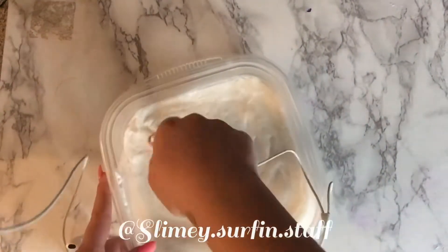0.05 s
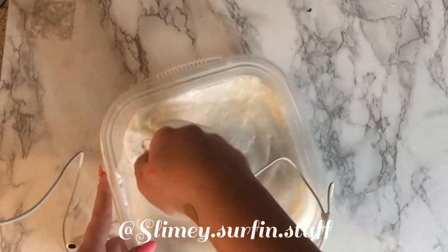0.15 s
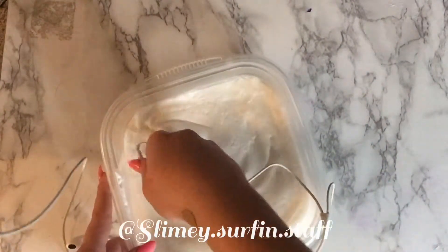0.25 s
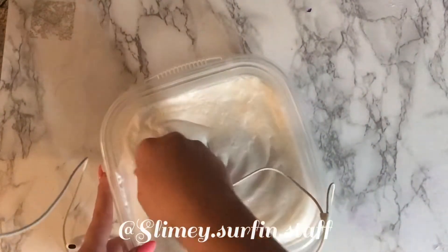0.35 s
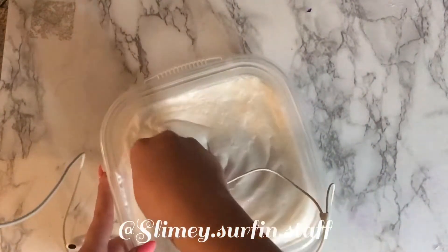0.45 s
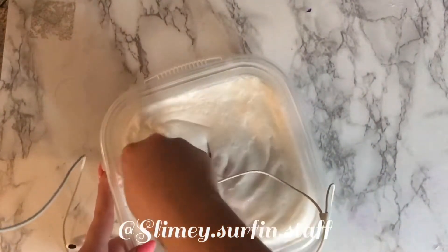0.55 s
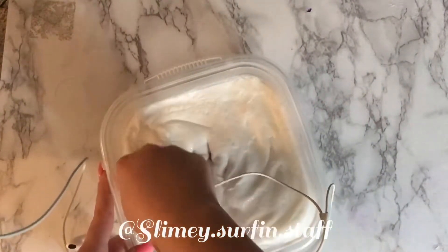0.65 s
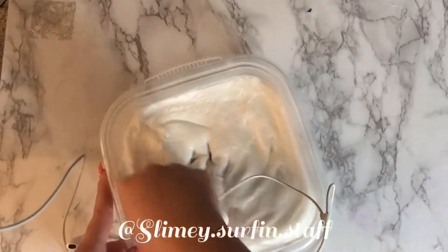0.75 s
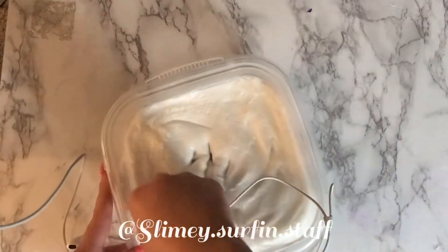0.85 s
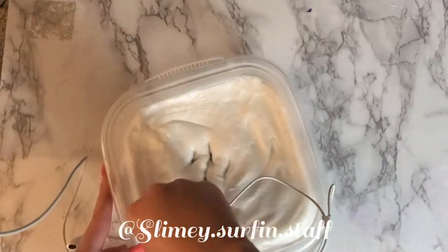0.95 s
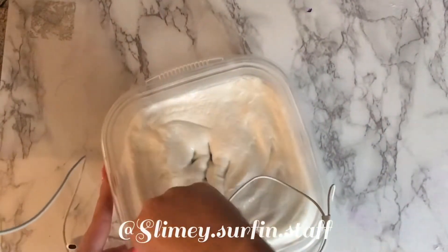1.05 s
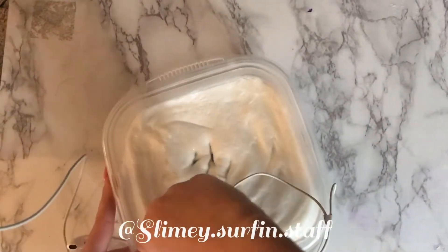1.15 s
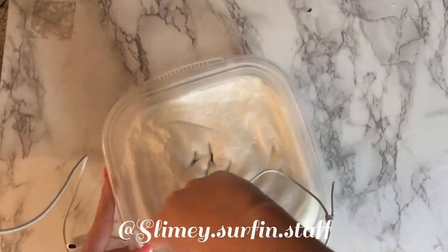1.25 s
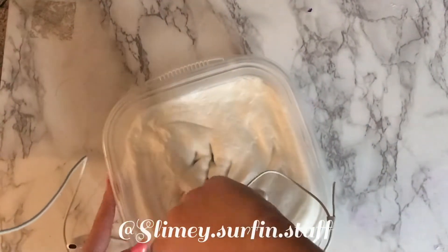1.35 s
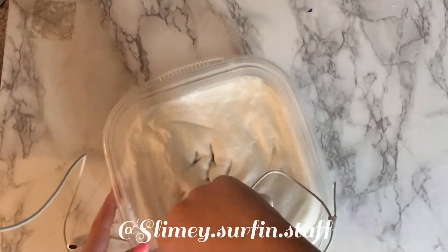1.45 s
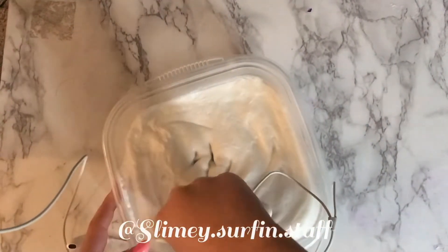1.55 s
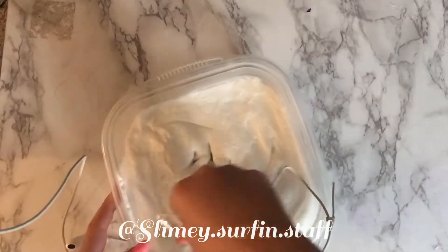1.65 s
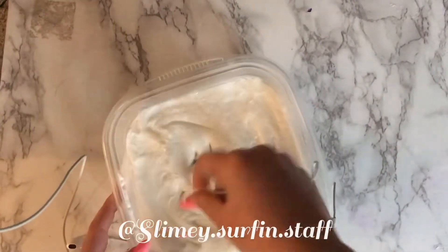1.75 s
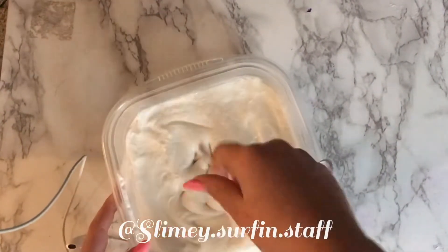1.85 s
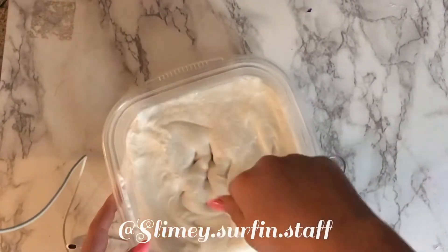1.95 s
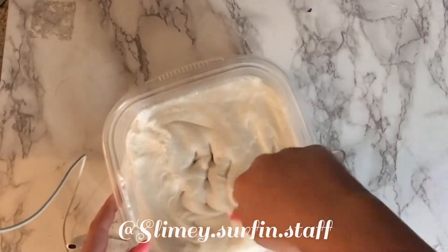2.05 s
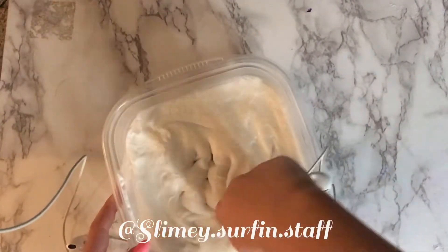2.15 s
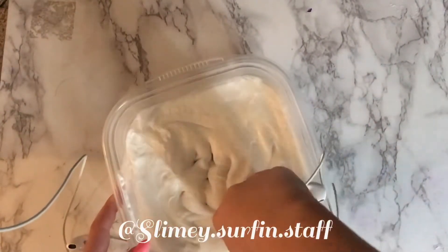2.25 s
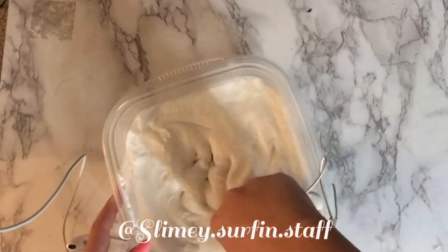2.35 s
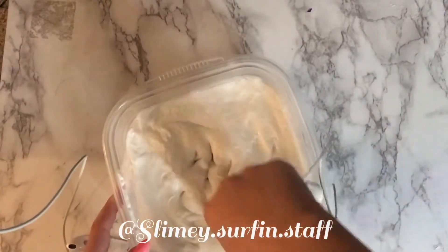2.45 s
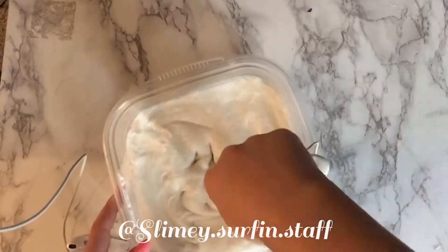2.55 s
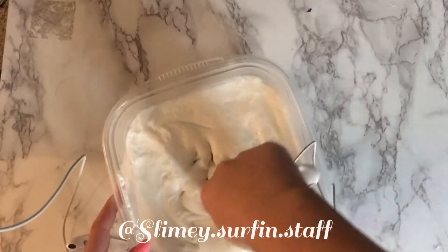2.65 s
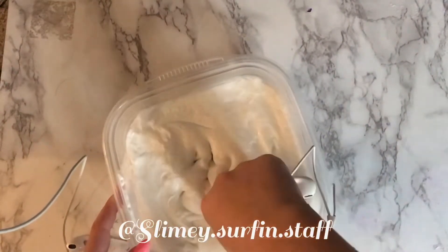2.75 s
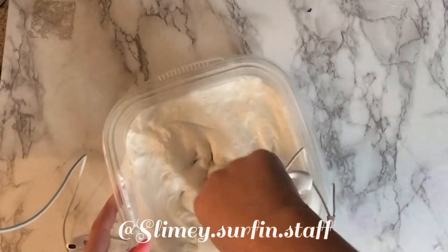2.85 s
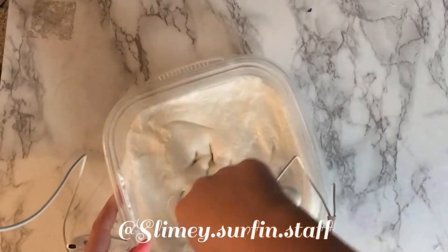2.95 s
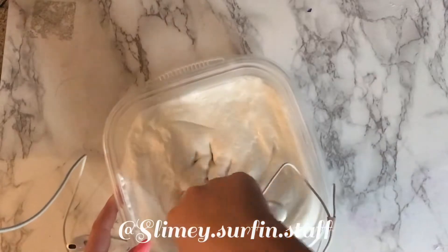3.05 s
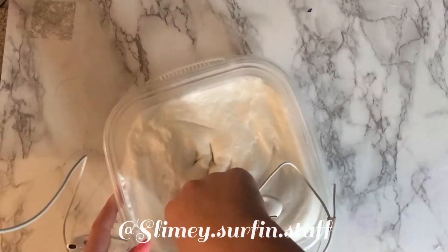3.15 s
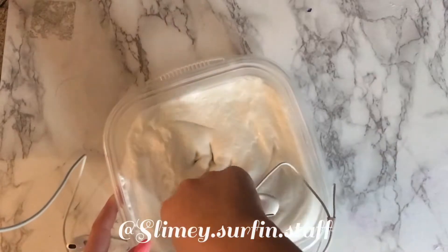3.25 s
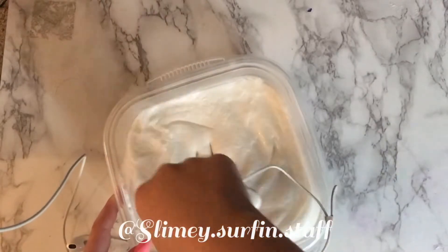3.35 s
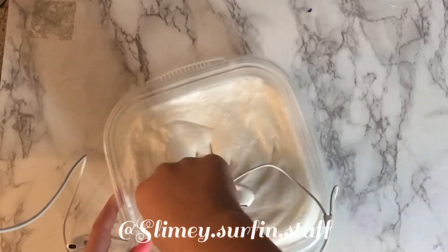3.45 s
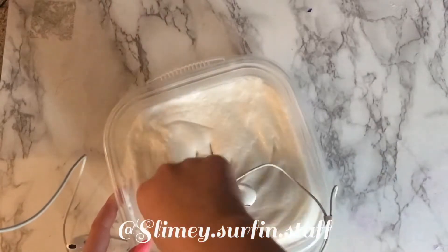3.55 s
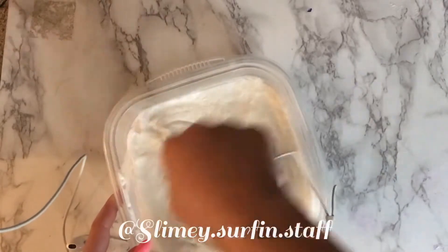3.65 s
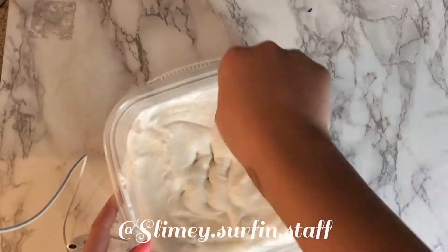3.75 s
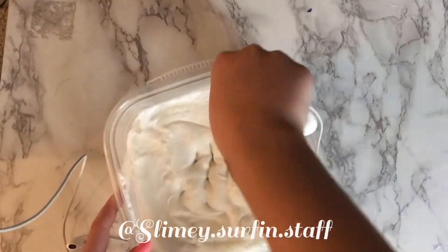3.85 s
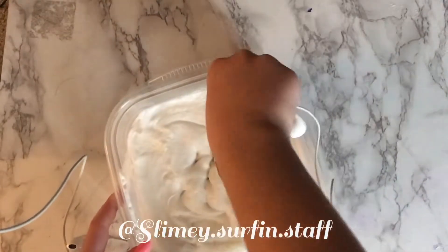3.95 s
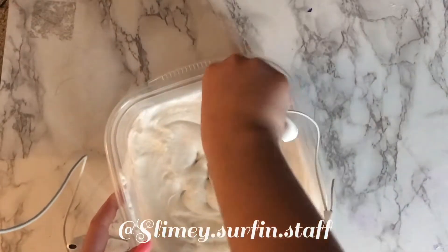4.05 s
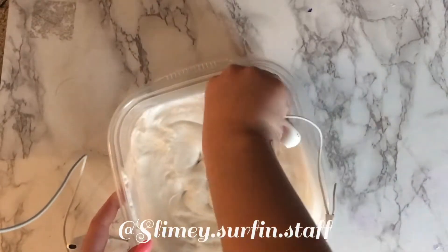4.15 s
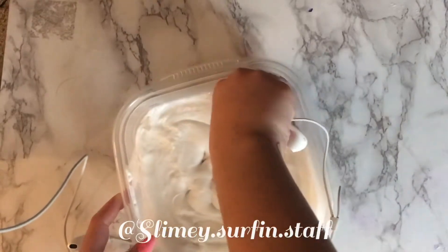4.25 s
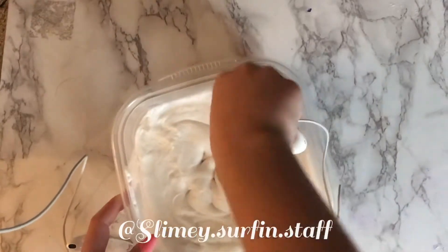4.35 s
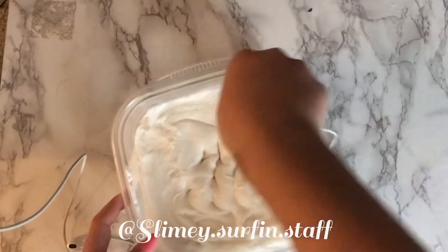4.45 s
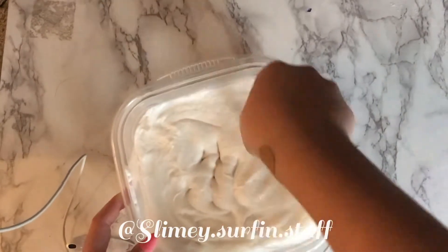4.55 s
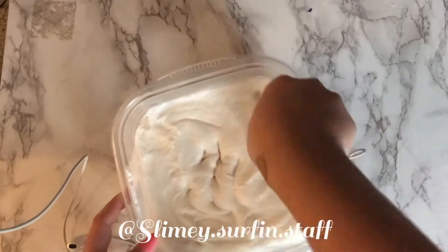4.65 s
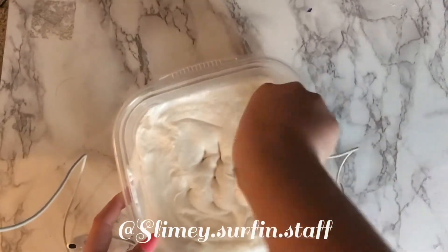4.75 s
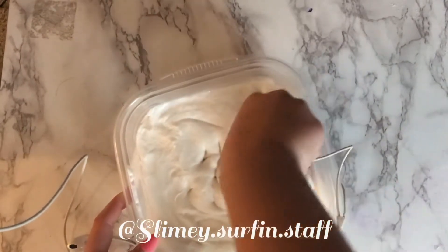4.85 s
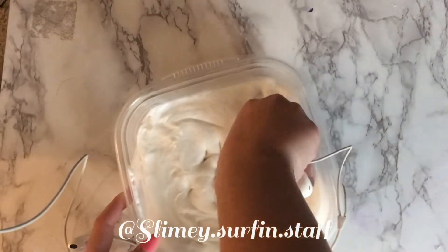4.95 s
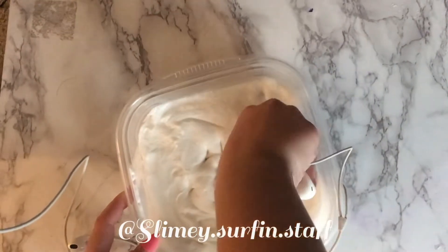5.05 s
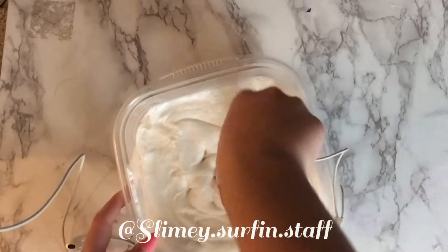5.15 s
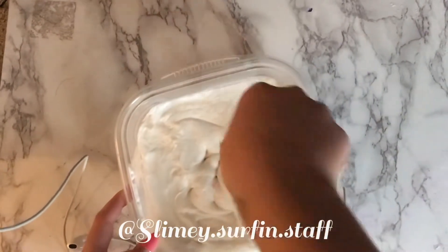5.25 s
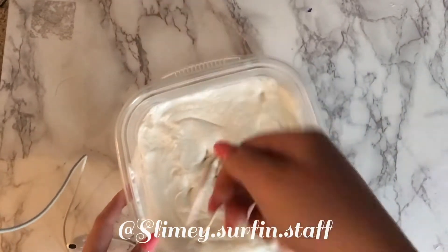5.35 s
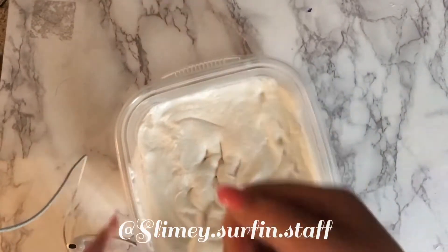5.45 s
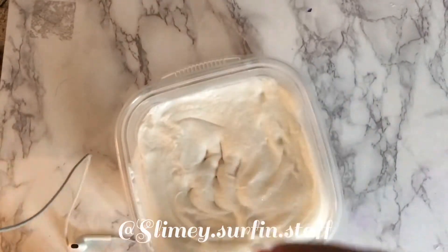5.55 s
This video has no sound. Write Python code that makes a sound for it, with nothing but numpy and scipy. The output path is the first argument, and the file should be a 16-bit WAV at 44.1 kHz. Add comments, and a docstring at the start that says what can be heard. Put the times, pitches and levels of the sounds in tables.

```python
"""Kneading airy slime

A hand presses slime in a plastic tub, with a small earphone microphone held right against it.
Rupturing films give short bright clicks, and trapped air pockets pop as damped oscillators.
Countless tiny bubbles fizz as the mass stretches, small pockets gurgle inside it, and the hand's push
thuds against the microphone and slowly heaves its membrane. A cavity in front of the capsule
resonates in the treble until the slime damps it. Faint rumble and hiss lie underneath."""
import sys
import numpy as np
from scipy import signal
from scipy.fft import rfft, irfft
from scipy.io import wavfile

SR = 44100
rng = np.random.default_rng(int(sys.argv[2]) if len(sys.argv) > 2 else 0)


def put_to_file(sound):
    """Save the sound as 16-bit audio at rate SR, in the file named by the first command-line argument."""
    columns = np.atleast_2d(sound).T  # one column per channel
    safe = np.clip(columns, -1, 1)
    whole_steps = np.round(safe * 32767)
    wavfile.write(sys.argv[1], SR, whole_steps.astype(np.int16))


N = 247120

# The mouth of the microphone's cavity. Each row: time in seconds, share free of slime from 0 to 1.
CAVITY_OPENING = [(0, 1), (.4, .87), (.6, .2), (1.5, .2), (1.7, .8), (2.1, .65), (2.3, .12), (5.6, .05)]


def film_snaps(times, levels_db, lengths_ms):
    """Sudden rupture radiates a broadband burst; levels_db sets its middle, cavity and top bands."""
    # The middle, cavity and top bands. Each row: lower edge in Hz, upper edge in Hz.
    bands = [(2000, 5460), (4700, 8050), (10000, 15500)]
    lead = SR // 500
    age = (np.arange(400) - lead) / SR * 1000 / lengths_ms[:, None]   # in snap lengths
    envelope = np.exp(-np.where(age < 0, 6.0, 2.2) * age ** 2)
    bursts = rng.standard_normal(age.shape) * envelope
    middle, broad, top = [band(bursts, low_hz, high_hz) for low_hz, high_hz in bands]
    ringing = cavity(broad, times[:, None])
    clicks = 0
    for part, level_db in zip((middle, ringing, top), levels_db):
        crest = np.sqrt(2 * np.mean(part[:, lead - 16:lead + 28] ** 2, axis=1))
        clicks = clicks + part * (from_db(level_db) / crest)[:, None]
    return place(times - lead / SR - .00015, clicks)


def clear_snaps():
    """Single films rupture as distinct clicks, whose spectral tilt makes them bright or dull."""
    # Each row: centre in seconds, cavity-band level in dB, tilt towards the treble in dB, length in ms.
    ruptures = [(0.0384, -36.5, 11, .5), (0.077, -20.5, 9.5, .4), (0.1282, -10, 4.5, .5),
                (.159, -31, 2, .5), (.167, -33, 11, .7), (.186, -29, 13, 1.2), (0.1906, -22, 8.5, .9),
                (.2865, -38.5, 11, .9), (0.3103, -36.5, 11, 1.5), (.371, -39, 3, 1.2),
                (0.422, -27.5, 0, .7), (0.424, -17, -2, 1.1), (.4277, -12, 8, .9), (0.43, -9, 5, .6),
                (0.4543, -9, 2, 1.4), (0.4571, -15, 9.5, .6), (.4796, -32.5, 3, .3),
                (.5006, -33.5, -11.5, .3), (.5867, -23.5, 11, .2), (0.5939, -26, 3, .5),
                (0.6253, -22.5, 4.5, .3), (.679, -29.5, -11, .7), (.693, -5.5, -9, .4),
                (0.7195, -30, 13, .3), (.7314, -11, 6.5, .2), (0.8298, -28.5, -6.5, .3),
                (0.8783, -27.5, 12.5, .3), (1.0194, -35.5, 2, .3), (1.1731, -54, 19, .3),
                (1.1863, -56, 22, .4), (1.3063, -39.5, 16.5, .7), (1.3467, -47, 14, 0.24),
                (1.3992, -34, 10, .3), (1.4334, -36.5, 6, 0.24), (1.642, -33, -1, .2),
                (1.645, -36, 13, 1.4), (1.6553, -25, 3, .5), (1.6724, -36, 1, .5), (1.713, -25.5, 8, .7),
                (1.735, -28.5, 7.5, .5), (1.704, -38, 9, .3), (1.744, -27.5, 8.5, 1.1),
                (1.964, -44.5, 7, .4), (2.221, -44.5, 11, .2), (2.2639, -37.5, 7, .3),
                (2.285, -33.5, -0.5, .7), (2.321, -50, 13, .2), (2.345, -37, 7, .4),
                (2.3747, -19.5, -13, .6), (2.3776, -37.5, -26, .7), (2.4544, -31, -8, .3),
                (2.4771, -27.5, 13, .2), (2.4875, -23, 14, .3), (2.49, -19, 4, .3), (2.507, -28.5, 8, 1.3),
                (2.637, -52.5, -15, 0.37), (2.7096, -48.5, 14, .3), (2.7606, -32.5, 7.5, .7),
                (2.7647, -45, 13, .2), (2.7698, -38, 4, .2), (2.809, -41, -7, .2), (2.8255, -40, 10, .2),
                (2.8727, -31.5, 10, .7), (2.914, -15.5, 7.5, .3), (2.9166, -32, 4, 0.24),
                (2.924, -26.5, 5, 2.9), (3.0679, -33, 6, .2), (3.0757, -14, 11.5, .2),
                (3.0906, -17.5, 16, .2), (3.1236, -37, 6, 1.5), (3.2095, -30.5, -14.5, .8),
                (3.2044, -42, -3, .7), (3.216, -1, -.5, .8), (3.2352, -34, -9.5, .5), (3.2961, -27, -1, .2),
                (3.3363, -32.5, 22, .3), (3.3378, -17.5, -13.5, .2), (3.3503, -34.5, 4, .6),
                (3.505, -27, 2, .2), (3.5088, -8, 3, .3), (3.5178, -0.5, 0, .9), (3.6193, -36, -11, 0.61),
                (3.6297, -19.5, 1, 1), (3.6358, -17, -2, 2.7), (3.636, -19.5, 5, 1), (3.6512, -36, 11, 1.8),
                (3.665, -19.5, 7, .9), (3.9153, -37, -0.5, 1.3), (3.9872, -40, 2.5, .3),
                (4.0337, -27, 0.5, .4), (4.0513, -31, -23, .3), (4.233, -42, -25, .3), (4.317, -28, -9, .6),
                (4.3223, -46, -15, .5), (4.4047, -36, 20, 0.68), (4.4224, -24, 3, 0.24),
                (4.4262, -27, 18.5, 0.58), (4.4305, -20.5, 10, .4), (4.4553, -20, 3, .5),
                (4.7311, -46, 8, 0.48), (4.736, -42, -21.5, 1), (4.798, -50, 11, 0.18),
                (4.8126, -31.5, 5.5, .2), (4.944, -43.5, -4, .3), (4.9744, -31, 8.5, .2),
                (4.9863, -33, 9, .3), (5.0097, -46, -3, .2), (5.017, -50, 7, .2), (5.0342, -2, -6.5, 0.33),
                (5.0491, -27, -13.5, .4), (5.1537, -35, -7, 1), (5.165, -41, -3, 1), (5.1764, -33, 14, .9),
                (5.1823, -31, 16, 0.28), (5.1965, -24.5, 2, .6), (5.1993, -25, 20, .3),
                (5.437, -40.5, 5, .8)]
    times, cavity_db, tilt_db, lengths_ms = np.transpose(ruptures)
    outer_db = cavity_db - 4 + 0.34 * np.minimum(tilt_db, 0)   # dull snaps lose more top than they gain
    return film_snaps(times, (outer_db - tilt_db, cavity_db, outer_db + tilt_db), lengths_ms)


def crackle(top_db, cavity_db, middle_db, count=1100):
    """Small films rupture as a random point process, coloured like the fizz and growing faster than it."""
    at = rng.integers(SR // 100, N, count)
    size, length, *colours = rng.standard_normal((count, 5)).T
    over_fizz_db = 1.5 + 0.65 * (top_db[at] + 37.5) + 5.5 * size
    levels_db = [fizz_db[at] + over_fizz_db + 3.0 * colour
                 for fizz_db, colour in zip((middle_db, cavity_db, top_db), colours)]
    lengths_ms = np.clip(.45 * np.exp(.7 * length), .2, 2.2)
    return film_snaps(at / SR, levels_db, lengths_ms)


def pocket_pops():
    """Trapped air is a spring, damped by its soft wall; a hollow knock sounds as the wall parts."""
    # Each row: crest time in seconds, swing peak in dB, pitch in Hz, ring length in cycles,
    # knock peak in dB, knock pitch in Hz.
    pockets = [(0.1286, -30, 387, 0.37, -52, 1740), (0.1907, -33.5, 600, 0.37, -29, 1230),
               (0.3713, -29, 440, .55, -52, 900), (.3995, -29, 378, .5, -45, 880),
               (0.421, -25, 670, 5.1, -25, 920), (0.427, -17.5, 287, 1.5, -21.5, 1100),
               (0.4303, -11, 517, 0.43, -18.5, 1020), (0.454, -21.5, 322, 1.2, -12.5, 1780),
               (0.4579, -22.5, 356, 0.45, -25.5, 1190), (.5007, -30.5, 490, 0.46, -29.5, 1350),
               (.587, -39, 540, 0.76, -27.5, 1520), (.5938, -24.5, 466, 0.43, -33, 1110),
               (0.6787, -38, 210, 3.3, -31, 1700), (.6935, -3.5, 343, 1.8, -13.5, 1630),
               (0.7137, -26, 380, 0.9, -37, 1320), (.724, -27, 320, 0.71, -53.5, 1010),
               (.8012, -41, 530, 1.8, -40, 960), (0.8334, -31.5, 520, 2.3, -36, 1600),
               (0.8406, -31.5, 375, 4, -38, 1130), (0.8896, -27.5, 333, 1.6, -32.5, 1460),
               (0.9138, -23.5, 547, 1.7, -45, 825), (0.9496, -32, 280, 5, -46, 920),
               (1.004, -32.5, 370, 2.3, -54, 870), (1.0065, -26, 327, 4.8, -32, 830),
               (1.0172, -25.5, 415, 0.57, -47, 830), (1.0914, -39, 420, 3.6, -40.5, 835),
               (1.2049, -35, 516, 7.1, -64, 820), (1.348, -30.5, 466, 1.5, -63, 850),
               (1.393, -31, 290, 2, -62, 870), (1.456, -29.5, 240, 2.2, -35.5, 1390),
               (1.6452, -28.5, 307, 3.5, -28.5, 1680), (1.6733, -26, 390, 0.73, -61, 820),
               (2.2032, -48, 240, 2, -40.5, 1100), (2.3748, -14.5, 494, 0.79, -19, 1200),
               (2.4501, -28.5, 420, 1.3, -32.5, 930), (2.479, -25, 300, 0.98, -37, 1556),
               (2.5065, -21, 390, 2.3, -60, 1190), (2.762, -34, 288, 3, -70, 930),
               (2.8054, -53, 247, 5.2, -30, 1330), (2.81, -49, 283, 3.1, -36, 1360),
               (2.8744, -28, 290, 0.89, -52, 1060), (2.9252, -32.5, 231, 2.1, -34, 1070),
               (3.0768, -27, 287, 4.4, -33, 1100), (3.091, -31, 316, 2.5, -31, 1020),
               (3.128, -11.5, 352, 1.45, -16.5, 860), (3.1405, -27, 298, 2, -56, 800),
               (3.2056, -20, 320, 4.9, -18.5, 970), (3.2125, -20, 322, 2.3, -20, 1040),
               (3.2166, -17, 377, 1.4, -20.5, 1600), (3.3371, -4, 306, 0.86, -9.5, 1230),
               (3.3404, -22, 190, 1.4, -27, 1080), (3.3489, -43, 362, 0.99, -21.5, 1125),
               (3.504, -34, 295, 1.7, -32.5, 1120), (3.5174, -21.5, 434, 0.58, -11.5, 1670),
               (3.6304, -25, 400, 1.7, -45, 1250), (3.6349, -31, 410, 1.3, -21, 1325),
               (3.6492, -34, 490, 3.6, -30, 1330), (3.665, -26, 380, 0.6, -41, 1070),
               (3.9135, -31.5, 343, 2.3, -35.5, 1340), (4.0337, -42.5, 283, 2.2, -30, 1710),
               (4.0516, -23, 422, 0.45, -27, 1280), (4.2318, -45, 450, 1.6, -34.5, 1680),
               (4.3223, -29.5, 302, 0.84, -33.5, 1420), (4.4209, -23, 283, 1.8, -25, 1080),
               (4.4515, -27, 320, .93, -29.5, 1230), (4.4563, -15.5, 376, 0.45, -30, 936),
               (4.7374, -14.5, 365, 1.6, -17, 1285), (4.8557, -32, 342, 4.5, -48, 1140),
               (5.0354, -11.5, 477, 1.35, -5.5, 1470), (5.049, -26.5, 576, 1.9, -21.5, 1320),
               (5.0889, -22, 370, 2, -59, 805), (5.152, -37, 653, 3, -30, 1080),
               (5.1653, -15.5, 314, 1.2, -17, 1340), (5.1968, -11, 510, 0.56, -12.5, 1150),
               (5.2015, -24, 473, 0.44, -26, 810), (5.2146, -27.5, 402, 1.9, -24.5, 1390),
               (5.2385, -41, 400, 0.96, -40, 1210)]
    times, swing_db, hz, cycles, knock_db, knock_hz = np.transpose(pockets)[:, :, None]
    cycles = np.clip(cycles, .5, 4)
    sign = rng.choice([-1, 1], times.shape)   # air bursts out or is sucked in
    swing = from_db(swing_db) * damped_swing(hz, 24.0 / cycles, 83, 1400, samples=1500)
    knock = from_db(knock_db) * damped_swing(knock_hz, 10.0 / cycles ** .3, 380, 2800, samples=400)
    return place((times - 0.28 / hz)[:, 0], sign * swing) + place(times[:, 0] - .0004, sign * knock)


def thuds():
    """The mass pushes on the microphone: a heavily damped oscillation of about one slow cycle."""
    # Each row: crest time in seconds, peak level in dB.
    pushes = [(0.426, -27.5), (.456, -35), (0.695, -34), (0.85, -39), (0.951, -39), (1.457, -33),
              (1.674, -40), (1.771, -36.5), (2.211, -39.5), (2.343, -35), (2.374, -33), (2.447, -39),
              (2.509, -37), (2.688, -38.5), (2.764, -37), (2.891, -30.5), (2.931, -33.5), (3.076, -41),
              (3.139, -31), (3.219, -26.5), (3.34, -20), (3.359, -31.5), (3.466, -36), (3.518, -25.5),
              (3.625, -27.5), (3.654, -32.5), (3.929, -40), (3.995, -40), (4.055, -37), (4.173, -36.5),
              (4.4, -34), (4.426, -22), (4.461, -30), (4.741, -22), (4.783, -36.5), (4.858, -37),
              (5.111, -40), (5.14, -43), (5.203, -24)]
    times, peak_db = np.transpose(pushes)[:, :, None]
    direction, detune = rng.standard_normal((len(times), 2)).T[:, :, None]
    hz = 93 * np.exp(.08 * detune)
    swing = from_db(peak_db) * damped_swing(hz, 22.0, 40, 250, samples=4000)
    return place((times - .55 / hz)[:, 0], np.sign(direction) * swing)


def tearing_levels():
    """Incoherent sources add in power: tears over the settling mass set fizz and squelch levels in dB."""
    # Each row: crest time in seconds, top fizz in dB, 20 dB rise time in ms, 20 dB fall time in ms,
    # middle fizz relative to top in dB, squelch in dB.
    tears = [(0.083, -36.5, 18, 31, -24, -47.5), (0.178, -39.5, 53, 38, -17.5, -49),
             (.309, -49.5, 22, 95, -10, -60), (0.431, -30.5, 12.5, 2, -9, -29.5),
             (0.6, -50.5, 63, 127, -3.5, -48), (0.701, -45, 76, 82, -4, -47.5),
             (0.801, -41, 112.5, 100, -15, -48), (0.883, -45, 63, 77, -3.5, -42),
             (1.041, -50, 82, 81, -7.5, -42.5), (1.307, -43, 23, 27, -11.5, -45.5),
             (1.39, -62.5, 78, 64, 6, -47.5), (1.456, -50.5, 27, 55, -8, -62),
             (1.555, -52.5, 27, 35, -8, -52), (1.655, -48.5, 20, 76, -9, -52),
             (1.73, -52, 87, 60, -12, -45.5), (1.841, -60, 82, 48, -17, -51),
             (2.26, -63, 84, 60, -0.5, -64), (2.335, -50.5, 47, 61, -7, -49),
             (2.494, -39.5, 58, 20.5, -4, -37.5), (2.79, -56.5, 102, 63, -8, -60),
             (2.875, -45, 22, 34, -3.5, -42.5), (2.92, -35.5, 18.5, 13, -16, -39),
             (3.083, -49, 25, 34, -7, -52), (3.131, -51, 39, 15, 0, -39), (3.211, -44, 27.5, 22, 6, -31),
             (3.344, -35, 23, 22.5, -4.5, -31.5), (3.512, -48, 42.5, 60, -4.5, -48.5),
             (3.637, -39.5, 44.5, 25, 2, -33), (3.92, -58, 14, 35, -9, -57), (4.14, -47, 87, 108, -14, -61),
             (4.26, -56.5, 157, 173, 7.5, -46), (4.421, -37, 44, 34, -6.5, -40.5),
             (4.455, -37, 26, 20, -11, -39), (4.739, -65.5, 24, 57, 0.5, -46),
             (4.871, -58, 67, 130, 1, -55), (4.981, -54, 18, 27, 5, -56.5), (5.039, -51, 12, 105, -2, -52),
             (5.16, -40, 22.5, 42, -0.5, -34), (5.196, -36.5, 35, 13, -17, -34.5),
             (5.43, -70, 150, 51, 5, -60)]
    # The mass between tears. Each row: time in seconds, top fizz in dB, squelch in dB.
    settling = [(0, -63, -58.5), (.2, -61.5, -51), (.25, -80, -57.5), (.44, -62, -62.5), (.55, -68, -63),
                (.97, -60, -52), (1.13, -64, -58.5), (1.27, -60, -58.5), (1.52, -64.5, -56.5),
                (1.85, -64.5, -62), (1.92, -75.5, -59), (2.14, -72, -61.5), (2.55, -85.5, -62),
                (2.7, -70, -62), (3.05, -87, -64), (3.3, -53.5, -61), (3.391, -80, -66), (3.9, -83.5, -62),
                (4.051, -59, -55.5), (4.4, -56.5, -77), (4.501, -96, -77), (4.699, -87, -61.5),
                (5.0, -71.5, -54), (5.25, -79.5, -60.5), (5.6, -73.5, -72.5)]
    t = np.arange(0, N, 32) / SR
    times, calm_top_db, calm_squelch_db = np.transpose(settling)
    calm_db = np.interp(t, times, calm_top_db)
    power = from_db(2 * np.array([calm_db, calm_db - 6.5, np.interp(t, times, calm_squelch_db)]))
    for crest_s, top_db, rise_ms, fall_ms, relative_db, squelch_db in tears:
        distance = 1000 * np.where(t < crest_s, (crest_s - t) / rise_ms, (t - crest_s) / fall_ms)
        loss_db = 20 * np.minimum(distance, 4) ** 1.53   # an exponent above 1 rounds the crest
        crest_db = np.array([[top_db], [top_db + relative_db], [squelch_db]])
        power = power + from_db(2 * (crest_db - loss_db))
    top_db, middle_db, squelch_db = 10 * np.log10(power)
    cavity_db = top_db - 0.5 + 0.45 * (middle_db - top_db) + 3 * free_share(t)
    return [np.interp(np.arange(N) / SR, t, db) for db in (top_db, cavity_db, middle_db, squelch_db)]


def fizz(top_db, cavity_db, middle_db):
    """Tiny bubbles burst in clumps as shot noise: separate clicks over a bed too dense to count."""
    clumps = from_db(3.4 * drift(78) + 1.6 * drift(250))
    clicks = unit_rms(impulses(per_s=1800, spread_db=5.5))
    coloured = unit_rms(clicks * from_db(rng.normal(0, 6, (3, N))))   # one row a band
    bursts = clumps * (.9 * coloured + rng.standard_normal(N))
    top = band(bursts[0], 10500, 15000)
    ringing = cavity(band(bursts[1], 4100, 9600), np.arange(N) / SR)
    middle = band(bursts[2], 1000, 5600)
    return (from_db(top_db) * median_scaled(top) + from_db(cavity_db) * median_scaled(ringing)
            + from_db(middle_db) * median_scaled(middle))


def squelch(level_db):
    """Small pockets gurgle inside the mass: random impulses excite broad, low resonances."""
    gurgle = sum(resonance(impulses(per_s=120, spread_db=2.5), hz, 0.54 * hz) / hz ** 1.3
                 for hz in (162, 240, 380, 630, 953))
    return from_db(level_db + 0.87 * drift(25)) * unit_rms(band(gurgle, 80, 990))


def heave():
    """The hand compresses trapped air, whose leak acts as a high-pass filter; a faint sway lies below."""
    # Each row: centre in seconds, peak before leakage in dB, width in ms, 1 to press or -1 to pull away.
    squeezes = [(0.324, -32, 35, -1), (0.348, -34, 12, 1), (0.428, -35, 15, 1), (0.708, -29, 40, 1),
                (0.775, -37, 50, -1), (0.855, -36, 94, 1), (2.771, -36.5, 22, 1), (2.925, -34, 15, -1),
                (3.224, -33, 16, 1), (3.286, -39, 32, -1), (3.341, -34.5, 12.2, 1), (3.524, -21.5, 19, 1),
                (3.597, -26, 25, -1), (4.28, -28, 44, 1), (4.389, -23, 34, -1), (4.425, -41, 17, 1),
                (4.953, -35, 24, 1), (5.172, -33, 18, 1), (5.195, -46, 21, -1)]
    t = np.arange(N) / SR
    pressure = sum(np.sign(direction) * from_db(peak_db) * np.exp(-2.8 * ((t - centre) * 1000 / ms) ** 2)
                   for centre, peak_db, ms, direction in squeezes)
    leaked = signal.sosfilt(signal.butter(1, 2.5, "high", fs=SR, output="sos"), pressure)
    sway_db = -55 + 3.3 * drift(4.8)
    sway = unit_rms(band(rng.standard_normal(N + SR), 3.0, 27)[SR:])
    return leaked + from_db(sway_db) * sway


def room_noise():
    """Room rumble and microphone hiss are stationary noise, strongest at low frequencies."""
    # Each row: frequency in Hz, relative spectral density in dB.
    spectrum = [(20, -14.5), (35, -20.5), (70, -15.5), (125, -16.5), (300, -27.5), (450, -25), (750, -40),
                (1100, -39), (3000, -44.5), (16000, -52)]
    corner_hz, density_db = np.transpose(spectrum)
    hz = np.maximum(np.arange(N // 2 + 1) * SR / N, 1)
    gain = from_db(np.interp(np.log(hz), np.log(corner_hz), density_db)) * (hz > 15)
    return from_db(-57) * unit_rms(irfft(rfft(rng.standard_normal(N)) * gain, N))


def cavity(x, times, hz=7200, width_hz=1540):
    """The cavity before the capsule resonates while its mouth is free and is damped by the slime."""
    free = free_share(times)
    ringing = resonance(resonance(x, hz, width_hz), hz, 2 * width_hz)
    return 3.2 * free * ringing + (1 - free) * x   # the gain makes up for the narrower band


def free_share(times):
    """The open share of the cavity's mouth, by linear interpolation."""
    return np.interp(times, *np.transpose(CAVITY_OPENING))


def damped_swing(hz, fall_db_per_cycle, low_hz, high_hz, samples):
    """Exponentially damped sinusoids, one a row, band-limited and scaled to peak 1."""
    cycles = hz * np.arange(samples) / SR
    rows = band(np.sin(2 * np.pi * cycles + .5) * from_db(-fall_db_per_cycle * cycles), low_hz, high_hz)
    return rows / np.abs(rows).max(axis=1, keepdims=True)


def resonance(x, hz, width_hz):
    """A two-pole resonator with gain 1 at its peak."""
    r = np.exp(-np.pi * width_hz / SR)
    feedback = [1, -2 * r * np.cos(2 * np.pi * hz / SR), r * r]
    return signal.lfilter(np.array([1, 0, -1]) * (1 - r * r) / 2, feedback, x)


def impulses(per_s, spread_db):
    """A random point process of clicks, uneven in size and sign."""
    sizes = from_db(spread_db * np.minimum(rng.exponential(1, N), 4)) * rng.choice([-1, 1], N)
    return sizes * (rng.random(N) < per_s / SR)


def drift(hz):
    """Low-passed noise: a random fluctuation of RMS 1."""
    r = np.exp(-2 * np.pi * hz / SR)
    return unit_rms(signal.lfilter([1], [1, -2 * r, r * r], rng.standard_normal(N + SR))[SR:])


def place(times, sounds):
    """Superposes the rows of sounds, each from its start in seconds."""
    track = np.zeros(N + sounds.shape[1])
    for start_s, sound in zip(times, sounds):
        start = round(start_s * SR)
        track[start:start + len(sound)] += sound
    return track[:N]


def band(x, low_hz, high_hz):
    return signal.sosfilt(signal.butter(2, [low_hz, high_hz], "band", fs=SR, output="sos"), x)


def median_scaled(x):
    """Scales to the median magnitude of unit normal noise, so lone clicks still stand out."""
    return x * .6745 / np.median(np.abs(x))


def unit_rms(x):
    return x / np.sqrt(np.mean(x ** 2) + 1e-20)


def from_db(db):
    return 10 ** (np.asarray(db) / 20)


def scene():
    """The sources superpose in the direct field at the microphone, with no room echo."""
    *fizz_db, squelch_db = tearing_levels()
    films = clear_snaps() + crackle(*fizz_db)
    slime = films + pocket_pops() + thuds() + fizz(*fizz_db) + squelch(squelch_db) + heave()
    return (slime + room_noise())[None]


def record(dry, cutoff_hz=15900):
    """Overload clips the loudest snaps, and a steep low-pass filter cuts the highest treble."""
    clipped = np.clip(dry, -.9, .9)
    return signal.sosfilt(signal.ellip(9, .5, 85, cutoff_hz, fs=SR, output="sos"), clipped)


dry = scene()
out = record(dry)
put_to_file(out)
```